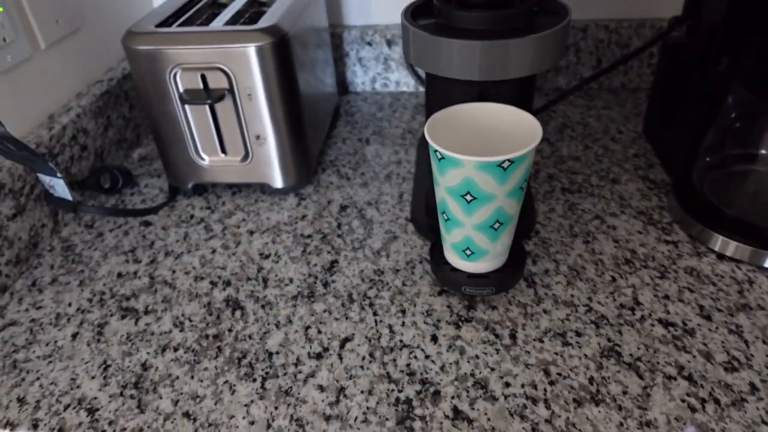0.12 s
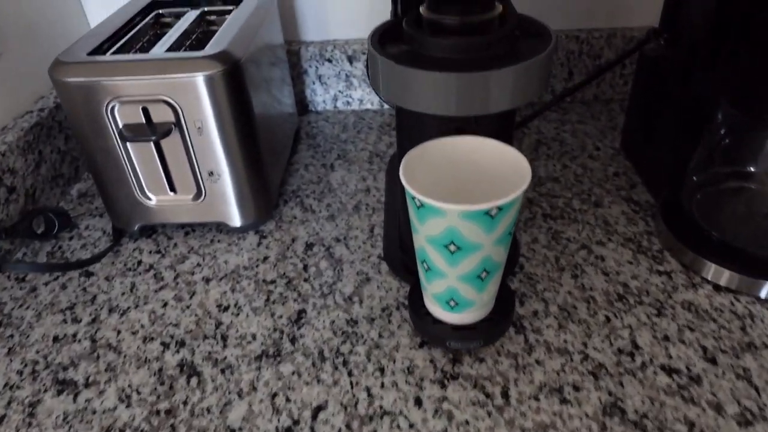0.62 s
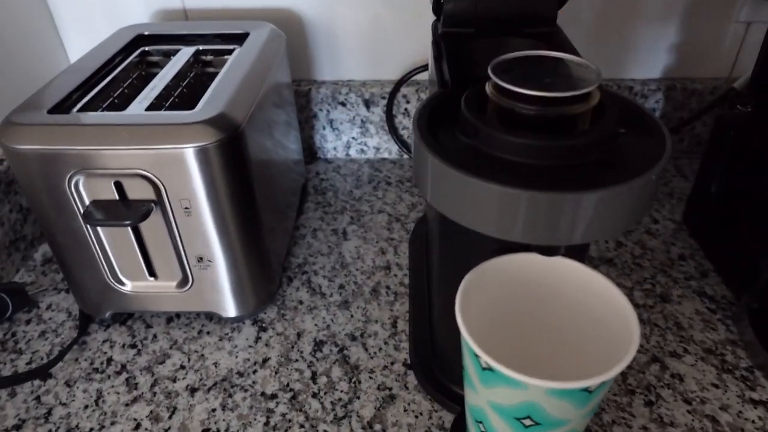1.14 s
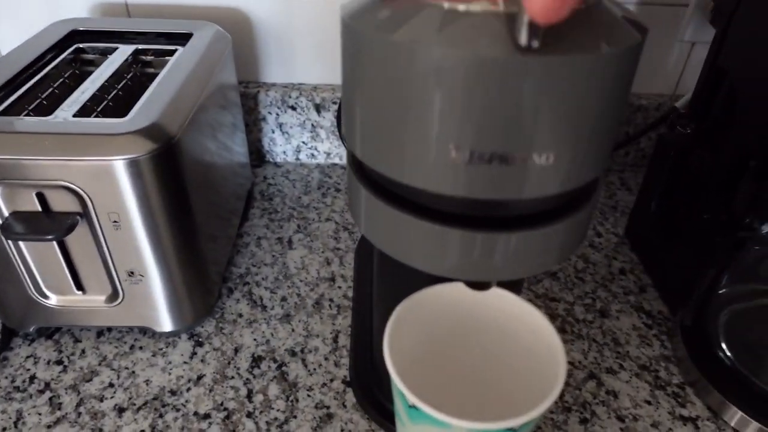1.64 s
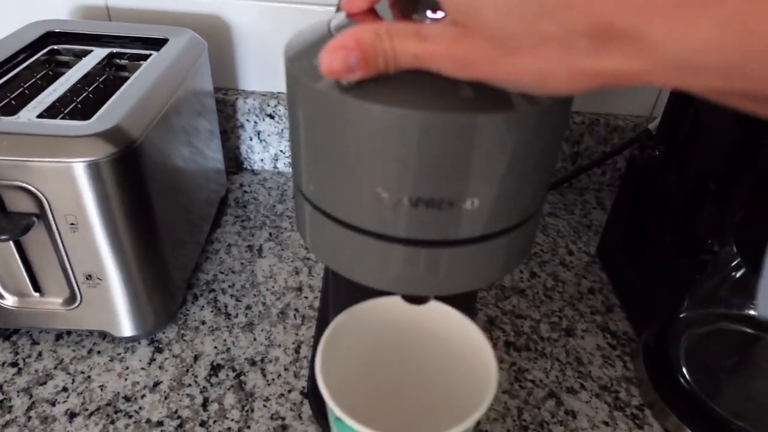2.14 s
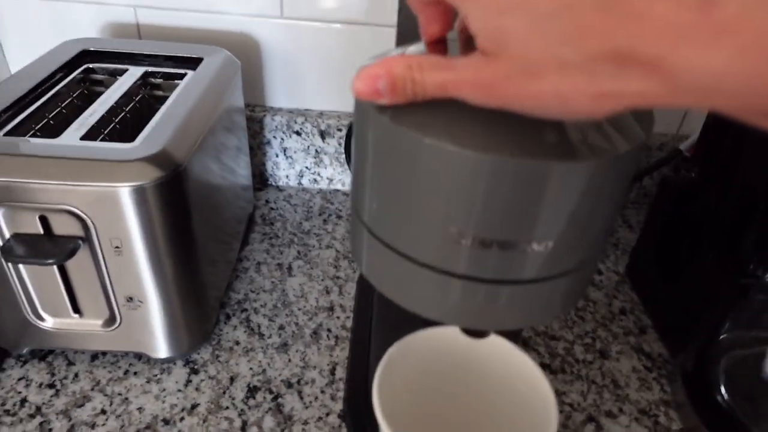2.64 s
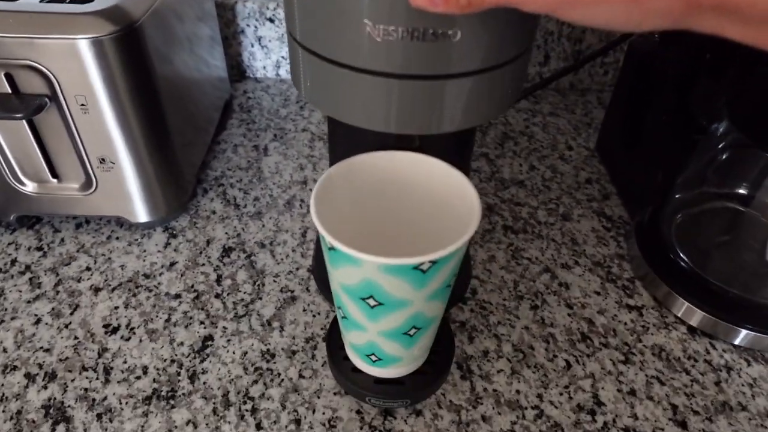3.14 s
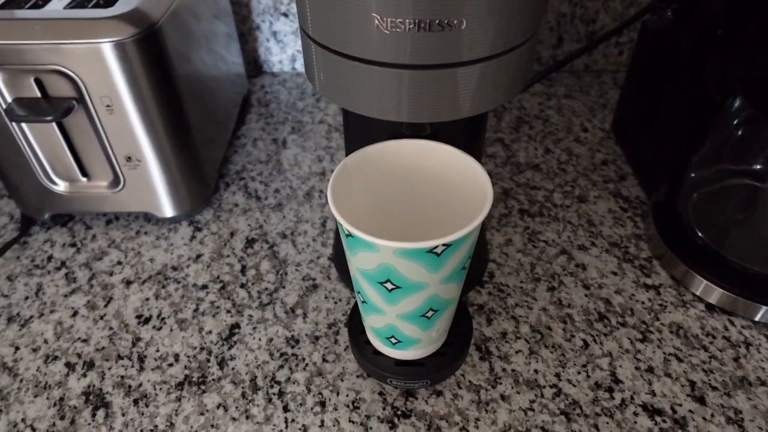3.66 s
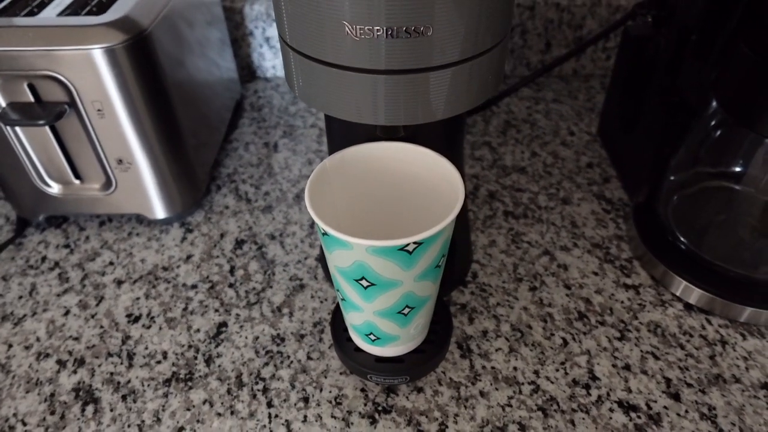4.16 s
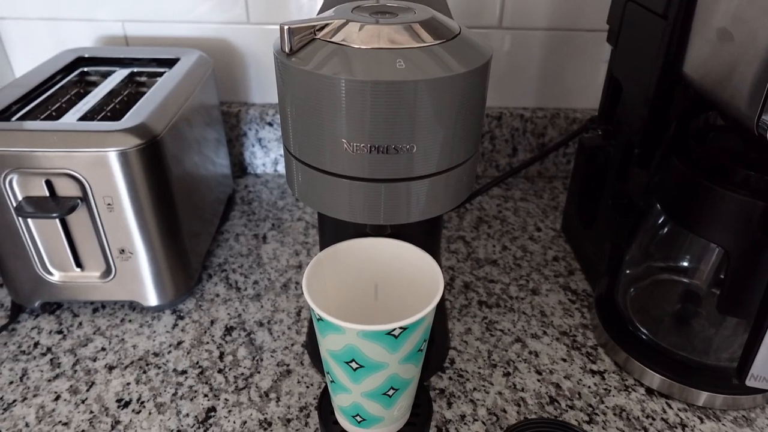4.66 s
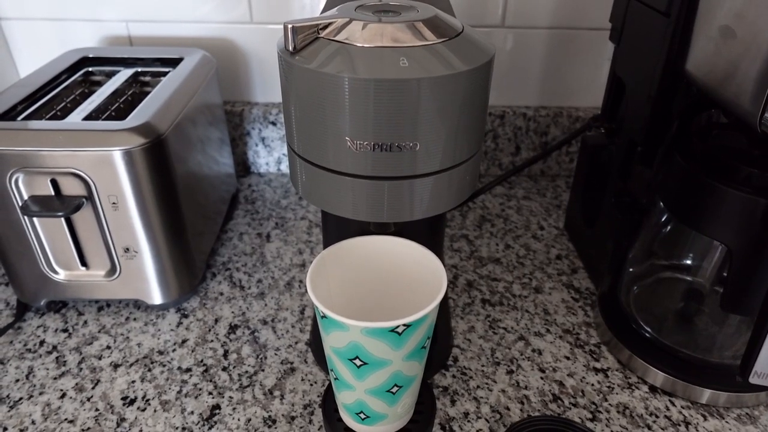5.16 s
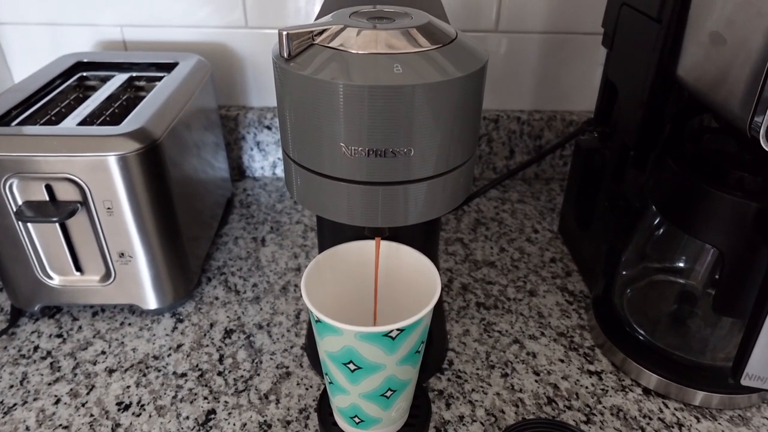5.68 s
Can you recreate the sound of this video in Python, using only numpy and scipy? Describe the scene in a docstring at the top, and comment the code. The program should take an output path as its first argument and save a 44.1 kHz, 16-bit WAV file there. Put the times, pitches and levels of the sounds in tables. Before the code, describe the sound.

Plastic scrapes, squeaks and sharp clacks as a capsule coffee machine is loaded and closed, then a pause and an abrupt steady whirring whine.

```python
"""Capsule coffee machine on a counter

A capsule coffee machine stands on a stone kitchen counter, close to the microphone. Sliding surfaces are
filtered noise with a rough envelope; the capsule and the clicks of the plastic head are decaying modes.
Then the drive whines, a sum of sines at multiples of a tooth rate that spins up, overshoots and settles,
over fixed mains harmonics and the noise of the brew. A room tone lies under it all."""
import sys
import numpy as np
from scipy import signal
from scipy.fft import rfft, irfft, next_fast_len
from scipy.io import wavfile
from scipy.ndimage import map_coordinates

SR = 44100
rng = np.random.default_rng(int(sys.argv[2]) if len(sys.argv) > 2 else 0)


def convert_level_to_amplitude(level_db):
    """Map a level in decibels to its linear amplitude factor."""
    exponent = np.asarray(level_db, float) / 20
    return 10 ** exponent


def inscribe(sig):
    """Save sig as 16-bit PCM at rate SR to the path in sys.argv[1].

    A 1-D sig is mono; a 2-D sig holds one channel per row.
    Samples are clipped to [-1, 1] before scaling.
    """
    pcm = np.round(np.clip(np.atleast_2d(sig).T, -1, 1) * 32767)
    wavfile.write(sys.argv[1], SR, pcm.astype(np.int16))


N = 255780
ON_S = 4.357  # the drive is switched on
SHAFT = 37 / 75  # turns of the second wheel's pattern per tooth

# modes of the plastic head: (frequency [Hz], relative level [dB])
HOUSING_MODES = [(1020, -4), (1640, -8), (1780, -8), (2300, -8.5), (2560, -4.5), (2940, -15.5),
                 (3300, -11.5), (3850, -9.5), (4700, -21), (5420, -12), (6290, -17), (7600, -8.5),
                 (8660, -14.5)]


def unit(x):
    """Normalisation: scales x to rms 1."""
    return x / np.sqrt(np.mean(x ** 2) + 1e-20)


def along(points, hz):
    """Log-frequency interpolation of (frequency [Hz], value) points."""
    f, v = np.transpose(points)
    return np.interp(np.log(hz + 1), np.log(f + 1), v)


def curves(rows):
    """Linear interpolation in time: one value per sample for each column after the time."""
    s, *columns = np.transpose(sorted(rows))
    return [np.interp(np.arange(N) / SR, s, column) for column in columns]


def wobble(rate):
    """Band-limited random modulation: a smooth curve through rate random knots a second."""
    knots = rng.standard_normal(int(N * rate / SR) + 4)
    return map_coordinates(knots, [np.arange(N) * rate / SR])


def coloured(x, spectrum):
    """Linear filtering: x through a (frequency [Hz], gain [dB]) response."""
    m = next_fast_len(N + 8192)
    gain = convert_level_to_amplitude(along(spectrum, np.fft.rfftfreq(m, 1 / SR)))
    return irfft(rfft(x, m) * gain, m)[..., :N]


def grit(spectrum, rate, rough_db):
    """Amplitude-modulated noise: coloured noise of rms 1 whose size varies from grain to grain."""
    noise = rng.standard_normal(N) * convert_level_to_amplitude(rough_db * wobble(rate))
    return unit(coloured(noise, spectrum))


def crackle(rate, size_db):
    """Shot process: a gain of rms 1 that jumps up at random and falls back within milliseconds."""
    snaps = (rng.random(N) < rate / SR) * rng.exponential(1, N) * convert_level_to_amplitude(size_db)
    decay = np.exp(-np.arange(SR // 50) / (0.004 * SR))
    return unit(1 + signal.fftconvolve(snaps, decay)[:N])


def resonant(x, centre_hz, lift_db, octaves):
    """Time-varying resonance: raises a moving band and the housing's fixed modes, level kept."""
    hz, t, z = signal.stft(x, SR, nperseg=1024)
    hz = hz[:, None]
    centre = np.interp(t, np.arange(N) / SR, centre_hz)
    gain = convert_level_to_amplitude(lift_db * np.exp(-(np.log2((hz + 1) / centre) / octaves) ** 2))
    gain *= 1 + 0.5 * sum(1 / (1 + ((hz - f) / 45) ** 2) for f, _ in HOUSING_MODES)
    kept = np.sqrt((abs(z) ** 2).sum(0) / ((abs(gain * z) ** 2).sum(0) + 1e-20))
    return signal.istft(z * gain * kept, SR, nperseg=1024)[1][:N]


def placed(x, left, wet_db, lead=((60, 0),)):
    """Interaural level and phase differences place the near sound; decaying noise is the reverberation."""
    # reverberation time of the kitchen: (frequency [Hz], t60 [s])
    kitchen = [(200, 0.12), (2000, 0.16), (10000, 0.13)]
    # strength of the room's answer: (frequency [Hz], gain [dB])
    walls = [(60, -24.5), (250, -8.5), (700, -3.5), (2500, -1), (15000, -7.5)]
    hz, t, z = signal.stft(rng.standard_normal((2, SR // 2)), SR, nperseg=256)
    decay_db = -60 * t / along(kitchen, hz)[:, None]
    tail = signal.istft(z * convert_level_to_amplitude(decay_db), SR, nperseg=256)[1]  # different in each ear
    late = np.pad(x, (200, 0))[None]
    wet = signal.fftconvolve(late, tail / np.linalg.norm(tail[0]), axes=1)[:, :N]
    m, ear = next_fast_len(N + 8192), np.array([[.5], [-.5]])
    hz = np.fft.rfftfreq(m, 1 / SR)
    stereo = convert_level_to_amplitude(ear * along(left, hz)) * np.exp(1j * ear * along(lead, hz))
    near = irfft(rfft(x, m) * stereo, m)[:, :N]
    return near + convert_level_to_amplitude(wet_db) * coloured(wet, walls)


def room_tone():
    """Partly correlated stereo noise: the quiet kitchen, whose level drops as the drive comes in."""
    # (frequency [Hz], relative level [dB])
    tone = [(15, -84), (25, -51.5), (85, -21.5), (138, -7.5), (252, -15.5), (389, -7), (1030, -14.5),
            (1510, -16), (1930, -17.5), (4480, -18.5), (11000, -28.5), (15200, -39.5), (16500, -37)]
    shared, left, right = (grit(tone, rate=6, rough_db=.8) for _ in range(3))
    quiet_db, drop_db = -63.5, 23
    level_db = np.where(np.arange(N) < ON_S * SR, quiet_db, quiet_db - drop_db)
    return convert_level_to_amplitude(level_db) * (.87 * shared + .48 * np.array([left, right]))


def squeaks():
    """Narrow-band noise on a gliding carrier: squeaks and hollow tones of rubbing surfaces."""
    # (start [s], length [s], start pitch [Hz], glide [Hz], level [dB])
    tones = [(0.056, 0.16, 613, 94, -33), (.14, 0.16, 1894, -40, -34), (.29, 0.066, 1234, -85, -39),
             (0.331, 0.19, 951, -100, -52.5), (0.394, 0.12, 1327, -100, -53.5),
             (0.624, .144, 701, -14, -33.5), (0.663, 0.051, 1914, -76, -32.5),
             (.945, .08, 484.3, -10.5, -20), (1.455, 0.083, 4900, 98.5, -23), (1.462, .12, 3214, 52, -30.5),
             (2.622, 0.016, 3760, 5, -36), (1.46, 0.1, 8580, 99, -30.5), (1.695, 0.04, 2540, -49, -24.5),
             (2.035, 0.052, 1018, 11, -39), (2.036, 0.021, 2533, 9, -35.5), (2.53, 0.029, 800, -22, -29.5),
             (2.839, 0.17, 1277, -39, -59), (2.84, 0.125, 1707, -53, -60.5), (2.85, 0.1, 3310, 150, -59.5),
             (2.87, 0.1, 3930, 200, -62), (4.049, .15, 7990, 588, -71.5), (4.192, 0.092, 1462, -35.5, -66)]
    out = np.zeros(N)
    for start, length, from_hz, glide_hz, db in tones:
        span = slice(round(start * SR), round((start + length) * SR))
        u = np.linspace(0, 1, span.stop - span.start)
        phase = 2 * np.pi * np.cumsum(from_hz + glide_hz * u) / SR
        width_hz = .13 * from_hz * np.sqrt(from_hz / 2000)  # share of the pitch, wider above 2 kHz
        narrow = wobble(width_hz)[span] * np.cos(phase) + wobble(width_hz)[span] * np.sin(phase)
        stutter_db = 2.5 * wobble(70)[span]
        swell = np.sqrt(np.sin(np.pi * u ** 0.58).clip(0))
        out[span] += convert_level_to_amplitude(db + stutter_db) * swell * narrow
    return out


def effort():
    """Envelope following by maximum: the strongest of hand and strokes sets scrape, low rub and fizz in dB."""
    # a hand moving on cup, counter and machine: (time [s], effort [dB], brightness [dB])
    touch = [(0.0, -27, -0.5), (0.156, -31, -2), (0.18, -27, -1), (0.244, -38.5, -4.5), (0.32, -36.5, 7.5),
             (0.372, -41.5, 8), (0.488, -52, 7.5), (0.546, -46.5, -6), (0.674, -30.5, -3), (0.728, -28, 1),
             (0.89, -32, -1), (0.95, -32.5, 7), (1.07, -46.5, 4.5), (1.26, -58.5, 2.5), (1.39, -49, 2.5),
             (1.65, -56, 2.5), (1.9, -51.5, 2), (1.975, -51.5, 4), (2.1, -56.5, 0), (2.4, -61, -2.5),
             (2.8, -59, 0), (2.882, -59.5, -0.5), (3.03, -58.5, 1.5), (3.236, -75, -8.5), (3.302, -64, 6),
             (3.45, -59.5, -1), (3.8, -75, 7)]
    # scrapes that build to a peak and let go; rub and fizz are relative to the scrape:
    # (peak time [s], build-up [s], peak level [dB], low rub [dB], fizz [dB])
    strokes = [(0.946, .0015, -11.5, -5, -26), (0.974, 0.041, -16, -1, -11.5),
               (1.108, .018, -27, -18.5, -8), (1.279, 0.0033, -36, 4, -14.5),
               (1.407, .002, -30.5, -26, 6.5), (1.49, .085, -14.5, -22, -9.5),
               (1.673, .014, -27.5, -15.5, -1), (1.706, .014, -16, -11.5, -3.5),
               (1.799, .002, -29.5, -6.5, -17), (1.982, 0.017, -39, -9, 0), (2.034, .002, -32, -9.5, -13),
               (2.183, .06, -63, -15, -12), (2.224, 0.0049, -38.5, -1.5, -33),
               (2.274, 0.072, -48.5, 1.5, -21), (2.47, .004, -45.5, -4, -30),
               (2.527, 0.0034, -31.5, -1, -10), (2.594, 0.054, -33, 0, -8), (2.632, 0.054, -38, -16, -34),
               (3.47, .004, -46.5, -12, -2), (3.509, 0.087, -48, -0.5, -2), (3.671, .006, -61, 12.5, 2.5)]
    # relative speed of letting go, rows scrape, low rub, fizz; the treble dies first: (speed [1])
    let_go_speed = [
        [1],
        [0.98],
        [1.3],
    ]
    build_db, let_go_db_per_s = 15, 340
    lingers_s = 0.14  # a stroke that builds this long lets go half as fast
    t = np.arange(N) / SR
    touch_db, bright_db = curves(touch + [(touch[-1][0] + .1, -120, 0)])
    # brightness trades low rub for fizz
    level = np.array([touch_db, touch_db - 4 - 0.93 * bright_db, touch_db - 7.5 + bright_db])
    for s, build_s, db, rub_db, fizz_db in strokes:
        before = (s - t) / max(build_s, 1e-3)
        rise_db = np.where(before < 1, -build_db * before, -120)
        fall_db = -let_go_db_per_s * np.array(let_go_speed) * (t - s) / (1 + build_s / lingers_s)
        shape_db = np.where(t < s, rise_db, fall_db)
        level = np.maximum(level, db + shape_db + np.array([[0], [rub_db], [fizz_db]]))
    return level


def hands():
    """Friction noise: gritty scrape of plastic, low rub on the counter, fine fizz of skin and foil."""
    # three spectra: (frequency [Hz], relative level [dB])
    scrape_spectrum = [(530, -31), (900, -4), (1010, 1.5), (1250, -5), (1390, -2), (2520, -4), (2790, -3.5),
                       (3260, -2.5), (4290, -6), (4720, -2.5), (7000, -15.5), (9100, -43.5), (15400, -120)]
    rub_spectrum = [(15, -68), (25, -38.5), (70, -39), (145, -14), (193, -20.5), (237, -5.5), (296, -9.5),
                    (375, -11.5), (475, -7), (523, -5.5), (652, -6.5), (706, -1.5), (867, -9.5), (985, -14),
                    (1100, -10), (1430, -41), (2420, -120)]
    fizz_spectrum = [(3530, -29), (6000, -1.5), (8780, -1.5), (13500, -11.5), (15200, -11), (16500, -32)]
    scrape_db, rub_db, fizz_db = effort()
    # the lighter the low rub, the lower the scrape's resonance is set: octaves fall with the difference
    centre_hz = 1600 * 2 ** (-3.2 * np.clip(scrape_db - rub_db, -10, 25))
    catch = wobble(60)  # all layers catch and let go together
    scrape = resonant(grit(scrape_spectrum, rate=540, rough_db=1.5), centre_hz, lift_db=10.5, octaves=0.93)
    snaps = crackle(rate=110, size_db=-2.5)
    rub = grit(rub_spectrum, rate=90, rough_db=1.0)
    fizz = grit(fizz_spectrum, rate=900, rough_db=1.5)
    scraping = convert_level_to_amplitude(scrape_db - 2.56 + 1.0 * catch) * np.sqrt(snaps) * scrape
    rubbing = convert_level_to_amplitude(rub_db + .7 * catch) * rub
    fizzing = convert_level_to_amplitude(fizz_db + 2.2 * catch) * snaps * fizz
    return scraping + rubbing + fizzing


def capsule():
    """Modal synthesis: the thin metal capsule rings in decaying sines after each landing."""
    # (frequency [Hz], relative level [dB], t60 [s])
    modes = [(1750, -11.5, 0.096), (1868, -8, 0.07), (2060, -9, 0.12), (2220, -9, 0.064),
             (3260, -15, 0.092), (5040, -8, 0.1), (5784, -15.5, .18), (5670, -8.5, 0.1), (7530, 1.5, 0.035)]
    # the capsule lands and bounces: (time [s], level [dB])
    landings = [(1.095, -24), (1.11, -21)]
    out, t = np.zeros(N), np.arange(SR // 3) / SR
    hz, level, t60 = np.transpose(modes)[:, :, None]
    for s, db in landings:
        mode_db = db + level + rng.normal(0, 2, hz.shape)
        ring = convert_level_to_amplitude(mode_db - 60 * t / t60) * np.sin(2 * np.pi * hz * t)
        out[round(s * SR):][:len(t)] += ring.sum(0)
    return out


def clicks():
    """Impact excitation: a contact rings housing modes near its centre, with crack, bright edge and thud."""
    # thud and edge are relative to the contact:
    # (time [s], level [dB], thud [dB], edge [dB], centre of the ring [Hz])
    contacts = [(0.1874, -16, -3, -2.5, 1840), (0.2734, -18.5, -7, -6, 1930), (0.3382, -18, -13, -12, 4640),
                (0.3863, -21, -33, 2.5, 3200), (0.4923, -38, -14.5, -7, 5460),
                (0.5756, -31.5, -6, -15.5, 5850), (0.6495, -15.5, -24, -13, 1990),
                (0.718, -17.5, -19, -13, 5230), (0.8383, -18, -5.5, -7, 5310), (0.9449, -7, 14, -25, 1770),
                (0.9898, -6.5, -34.5, -24.5, 2950), (1.0961, -5.5, -36, -15.5, 2330),
                (1.1077, -5.5, -18, -15, 3170), (1.2435, -36.5, 4, -16, 1640), (1.276, -24, 7, -12, 1160),
                (1.2984, -23.5, -20, -18, 5540), (1.3781, -41.5, -14, 6.5, 3690),
                (1.4035, -10.5, -39, -3, 3120), (1.426, -9, -36, -5, 5970), (1.4475, -2, -47, -16, 4700),
                (1.659, -20.5, -10, -7.5, 5030), (1.6927, -1.5, -16, -11.5, 2720),
                (1.7991, -11.5, -15, -28, 2250), (1.8198, -16.5, -31, -16.5, 1420),
                (1.8508, -24, -27, -9.5, 2130), (1.9847, -21.5, -18, -8.5, 5350),
                (2.0166, -25, -5, -5, 5290), (2.0322, -14, -7, -19.5, 5300), (2.05, -39, -22, -21, 1010),
                (2.0849, -18.5, -11, -19.5, 1580), (2.158, -34, -10, -30, 2360),
                (2.219, -26, -12, -37, 2400), (2.2535, -28, 0, -27, 2450), (2.2677, -26.5, -4, -32, 1600),
                (2.4145, -32, -8, -25, 1050), (2.4343, -26, -16, -33, 1400), (2.463, -17.5, -35, -42, 1500),
                (2.5213, -19, -20, -57, 1730), (2.5395, -13, -2, -23, 2280), (2.5822, -5, -20, -10, 1640),
                (2.6261, -11, -28, -65, 3670), (2.7086, -36, -21, -16, 1650), (2.7394, -37, 1, -21, 1020),
                (2.7746, -31, -9, 3.5, 1120), (2.8178, -29.5, -5, -3, 1620),
                (3.0035, -22.5, -25.5, -4, 4040), (3.37, -23, -30.5, -10, 1730),
                (3.422, -33, -21, -4, 3120), (3.466, -28, -15, -16, 1103), (3.667, -36, 13.5, 0.5, 1010)]
    ring_t60_s, crack_t60_s, edge_t60_s, thud_t60_s = 0.059, .035, 0.02, 0.027
    out, t = np.zeros(N + SR), np.arange(SR // 4) / SR
    hz, level = np.transpose(HOUSING_MODES)[:, :, None]

    def band(lo_hz, hi_hz):
        """Band-pass filtering: noise of rms 1 between two frequencies."""
        sos = signal.butter(3, [lo_hz, hi_hz], "band", fs=SR, output="sos")
        return unit(signal.sosfilt(sos, rng.standard_normal(len(t))))

    for s, db, thud_db, edge_db, centre_hz in contacts:
        near_db = level - 9 * abs(np.log2(hz / centre_hz)) + rng.normal(0, 2, hz.shape)
        ring = (convert_level_to_amplitude(near_db - 60 * t / ring_t60_s) * np.sin(2 * np.pi * hz * t)).sum(0)
        wide = band(centre_hz / 2.9, min(centre_hz * 2.72, 9000))
        narrow = band(centre_hz / 1.4, centre_hz * 1.2)
        crack = convert_level_to_amplitude(-7.0 - 60 * t / crack_t60_s) * (0.6 * wide + 0.76 * narrow)
        edge = convert_level_to_amplitude(edge_db - 7.5 - 60 * t / edge_t60_s) * band(7000, 15500)
        thud_rise = 1 - np.exp(-t / 0.0015)
        thud = convert_level_to_amplitude(thud_db - 8 - 60 * t / thud_t60_s) * thud_rise * band(320, 550)
        contact = convert_level_to_amplitude(-10) * ring / abs(ring).max() + crack + edge + thud
        out[round(s * SR):][:len(t)] += convert_level_to_amplitude(db) * contact
    return out[:N]


def mains_buzz(t):
    """Additive synthesis: mains harmonics that stay put whatever the drive speed."""
    # (frequency [Hz], relative level [dB])
    harmonics = [(240, -64), (480, -59), (720, -64), (960, -50), (1200, -45), (1440, -44), (1680, -44),
                 (1920, -52), (2160, -54)]
    buzz = 0
    for hz, db in harmonics:
        buzz = buzz + convert_level_to_amplitude(db) * np.sin(2 * np.pi * hz * t + 2 * np.pi * rng.random())
    return convert_level_to_amplitude(3) * buzz


def brew_hiss(t, teeth, on):
    """Turbulent flow noise: a spluttering hiss that grows with the flow and pulses with the shaft."""
    # (frequency [Hz], relative level [dB])
    hiss_spectrum = [(18, -60), (40, -35), (170, -39), (350, -27.5), (800, -12.5), (1500, -3), (2250, -4.5),
                     (2600, 3.5), (2800, 5), (3300, 0), (4000, -6), (5100, -2), (7900, -3), (8700, -6),
                     (9500, -3), (9900, -9), (10300, -6), (13500, -9.5), (15500, -7.5), (16500, -5.5)]
    # short bursts of the hiss: (time [s], lift [dB], half length [s])
    spits = [(5.023, 8, .005), (5.132, 2, .008), (5.777, 5.5, .02)]
    start_db, grows_db_per_s = -28.5, 1.52
    splutter = rng.standard_normal(N) * crackle(rate=23, size_db=-6) * convert_level_to_amplitude(0.68 * wobble(120))
    spit_db = sum(db * np.clip(1 - abs(ON_S + t - s) / half_s, 0, 1) for s, db, half_s in spits)
    pulse = 1 + 0.11 * np.sin(SHAFT * teeth)
    noise = unit(coloured(splutter, hiss_spectrum))[on]
    return convert_level_to_amplitude(start_db + grows_db_per_s * t + spit_db) * pulse * noise


def gear_whine(rate_hz, full_hz, teeth, on):
    """Order-locked tones: gear and bearing lines follow the speed and the casing's response."""
    # lines at teeth x tooth rate + turns x shaft rate: (teeth [1], turns [1], relative level [dB])
    gear_lines = [(0, 1, -56), (0, 2, -65), (1, 0, -50), (0, 3, -44), (1, 1, -51), (0, 4, -51), (2, 0, -57),
                  (0, 5, -37), (1, 3, -55), (0, 6, -51), (3, 0, -35), (1, 5, -53), (2, 3, -52), (3, 1, -41),
                  (4, -1, -42), (1, 6, -55), (3, 2, -52), (4, 0, -51), (0, 9, -52), (4, 1, -49),
                  (5, -1, -36), (4, 2, -48), (5, 0, -22), (5, 1, -33), (6, -1, -35), (0, 12, -48),
                  (6, 0, -33), (7, -2, -47), (6, 1, -49), (6, 2, -44), (7, 0, -49), (7, 2, -49),
                  (8, 0, -42), (8, 2, -48), (9, 0, -43), (10, 0, -45), (10, 1, -45), (11, -1, -41),
                  (11, 0, -46), (12, 0, -49), (12, 1, -47), (14, 0, -54), (15, 0, -40), (16, 0, -56),
                  (17, 0, -47), (18, 0, -43), (19, 0, -49), (21, 0, -47), (0, 45, -52), (28, 0, -53)]
    # (multiple of tooth rate [1], relative level [dB])
    bearing_lines = [(1.11, -64), (3.22, -54), (4.07, -51), (5.7965, -48), (6.29, -39), (8.9595, -49),
                     (10.7965, -54), (14.43, -51), (15.17, -52)]
    # how the casing passes a line, relative to its value at full speed: (frequency [Hz], gain [dB])
    casing = [(200, 8.5), (1300, 9.5), (1600, -2), (1950, 9), (2150, -3), (2450, 0.5), (2670, -1.5),
              (2950, 17), (3040, 8), (3120, 18.5), (3200, 5.5), (3600, 24)]
    side_slow_db = 79  # side lines of the shaft stay down until at speed: dB per share of speed missing
    # high tooth orders carry faint side lines one and two shaft turns away
    side = [(k, turns, -54 - .4 * (k - 11) + rng.normal(0, 2)) for k in range(11, 20) for turns in (-1, 1, 2)]
    lines = [(k + turns * SHAFT, db, k * turns != 0) for k, turns, db in gear_lines + side]
    lines += [(k, db, 0) for k, db in bearing_lines]
    slow = np.clip(1 - rate_hz / full_hz, 0, 1)
    sway_db = [1.23 * wobble(12)[on] for _ in range(8)]
    whine = 0
    for i, (k, db, is_side) in enumerate(lines):
        casing_db = along(casing, k * rate_hz) - along(casing, k * full_hz)
        slow_db = 22 * slow * max(k - 6.5, 0) + side_slow_db * is_side * slow  # high lines clear up late
        gain = convert_level_to_amplitude(db + casing_db - slow_db + sway_db[i % len(sway_db)])
        whine = whine + gain * np.sin(k * teeth + 2 * np.pi * rng.random())
    return convert_level_to_amplitude(2.5) * whine


def drive():
    """Rotating-machine noise: one tooth phase drives the whine and the pulsing hiss, beside the mains buzz."""
    # the drive spins up, overshoots, settles, then hunts a little: (time [s], tooth rate [Hz])
    speed = [(4.357, 462.0), (4.4, 492.8), (4.43, 506.5), (4.49, 533.3), (4.52, 539.6), (4.55, 536.4),
             (4.59, 531.0), (4.645, 533.8), (4.9, 532.2), (5.0, 533.3), (5.35, 532.4), (5.42, 534.3),
             (5.5, 528.6), (5.545, 533.6), (5.63, 532.9), (5.68, 535.3), (5.8, 534.8)]
    hunt_hz, hunts_per_s = .8, 25
    whine_rise_s, flow_rise_s = .014, 0.00514  # time constants of the start
    on = np.arange(N) >= ON_S * SR
    t = np.arange(on.sum()) / SR
    rate_hz = (curves(speed)[0] + hunt_hz * wobble(hunts_per_s))[on]
    teeth = 2 * np.pi * np.cumsum(rate_hz) / SR
    whine = (1 - np.exp(-t / whine_rise_s)) * gear_whine(rate_hz, speed[-1][1], teeth, on)
    rest = (1 - np.exp(-t / flow_rise_s)) * (mains_buzz(t) + brew_hiss(t, teeth, on))
    out = np.zeros(N)
    out[on] = whine + rest
    return out


def scene():
    """Superposition: hands and clicks first, then the drive, all on the room tone."""
    # left against right: (frequency [Hz], level difference [dB])
    hands_left = [(60, 1), (240, -0.5), (950, -1), (3770, -2), (15000, -3.5)]
    drive_left = [(60, 0.0), (130, 7), (290, -0.5), (640, 2.5), (1410, -4.5), (3100, 0), (6820, -1.5),
                  (15000, -3.5)]
    # phase by which left leads: (frequency [Hz], lead [rad])
    drive_lead = [(60, 0), (2300, 0), (2670, 0.16), (2950, 0.52), (3190, 1.1), (3450, 0.62), (4000, 0)]
    knocks = coloured(clicks() + capsule(), [(30, -32.5), (100, -12.5), (200, -1)])
    handling = placed(hands() + squeaks() + knocks, hands_left, wet_db=-13)
    machine = placed(drive(), drive_left, wet_db=-26, lead=drive_lead)
    return handling + machine + room_tone()


def roll_off(x):
    """The treble ends steeply here."""
    return signal.sosfilt(signal.butter(12, 17000, fs=SR, output="sos"), x)


def record(dry):
    """Microphone response: a linear filter that thins the bass and cuts the top treble."""
    # (frequency [Hz], gain [dB])
    microphone = [(20, -16), (60, -2.5), (120, -0.5), (15700, 2), (15900, -47), (16500, -49)]
    mix = coloured(dry, microphone)
    return roll_off(mix)


dry = scene()
out = record(dry)
inscribe(out)
```